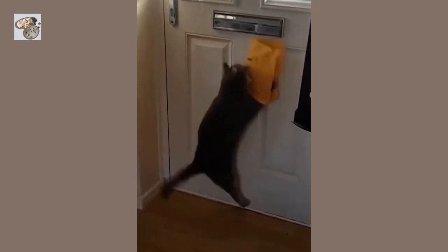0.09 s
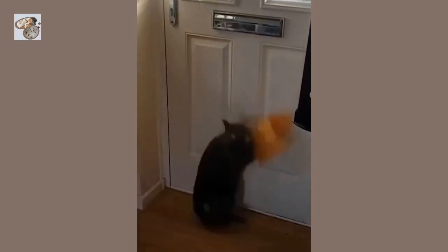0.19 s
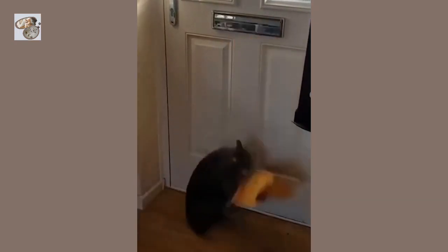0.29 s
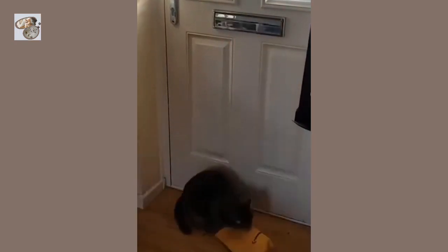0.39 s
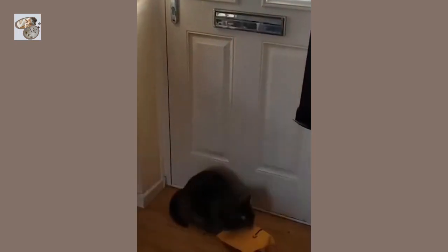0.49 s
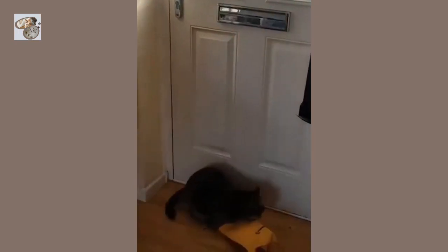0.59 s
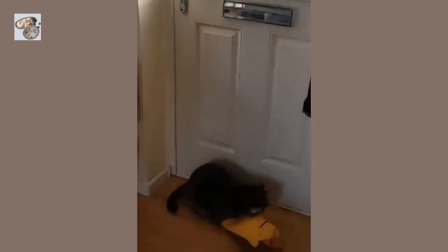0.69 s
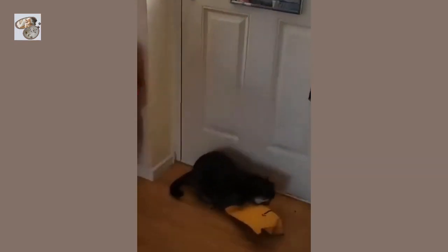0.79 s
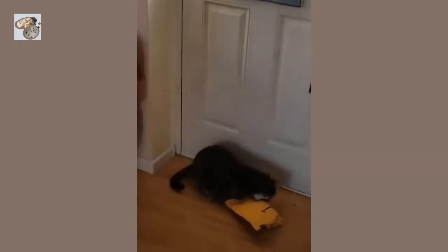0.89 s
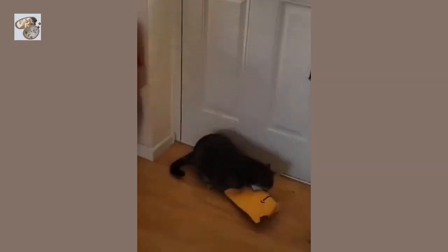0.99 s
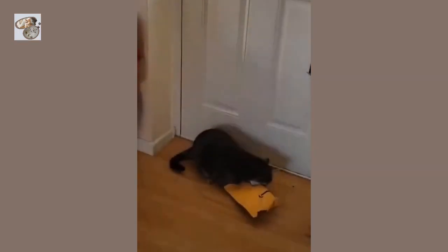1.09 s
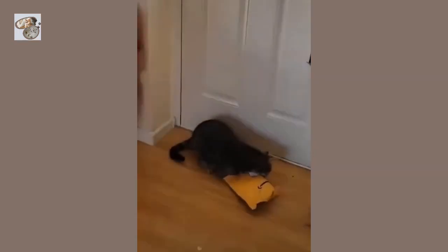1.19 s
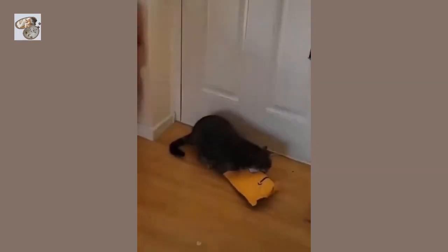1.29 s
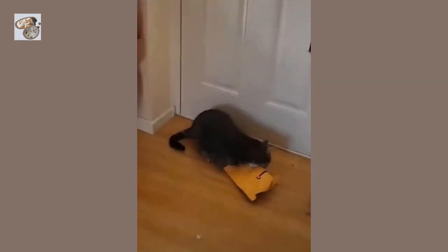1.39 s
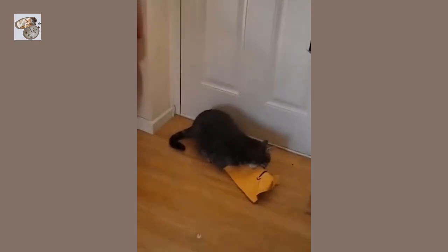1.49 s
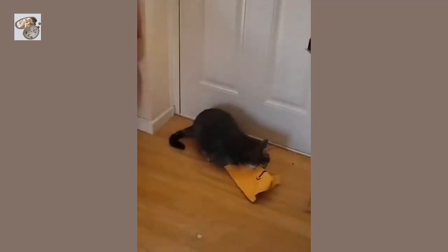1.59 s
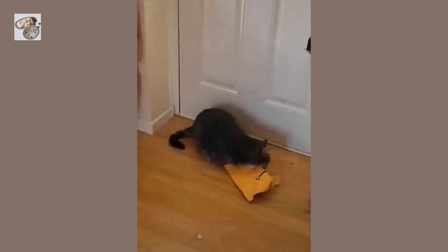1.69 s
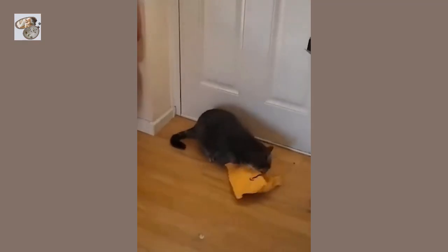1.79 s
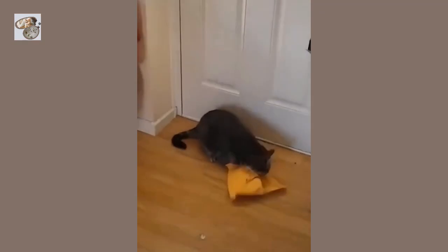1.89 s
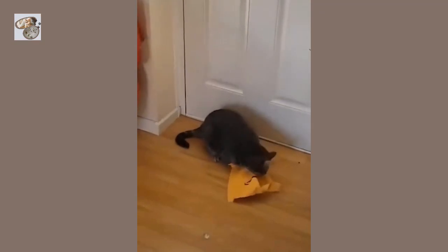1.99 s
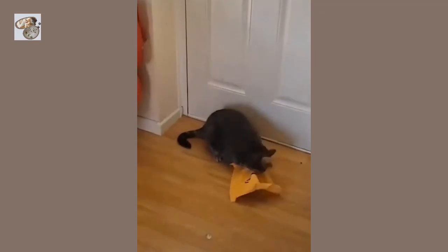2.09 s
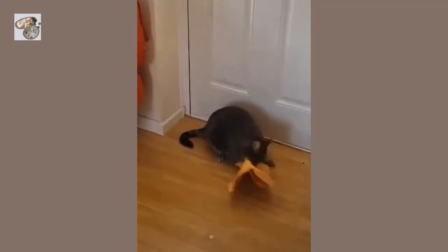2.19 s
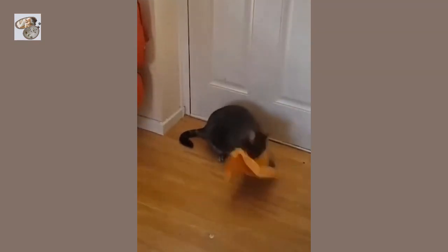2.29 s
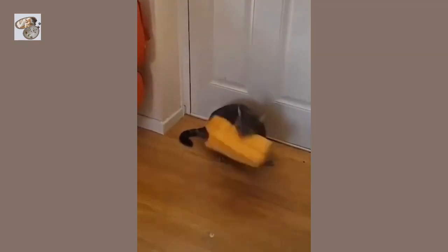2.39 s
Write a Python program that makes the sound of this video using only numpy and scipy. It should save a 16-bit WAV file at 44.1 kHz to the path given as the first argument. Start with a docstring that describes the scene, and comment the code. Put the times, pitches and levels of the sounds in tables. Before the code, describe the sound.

Padded envelope rasps through a letterbox flap, lands with a heavy wooden thud, then rustles quietly.

```python
"""In a small bare hall with a wooden floor, a cat drags a padded envelope out of a metal letterbox.
Paper scrapes and rasps through the flap: noise of tiny slips, shaped by jerks and resonances.
The cat lands on ringing floor modes; the envelope slaps down in filtered bursts and topples flat.
Short bright ticks come from snapping paper, then claws; paws and nose bring rustles, pops and rubs.
In stereo, with reflections after 2 ms over a quiet house, through a microphone with a bass roll-off."""
import sys
import numpy as np
from scipy import signal
from scipy.fft import rfft, irfft
from scipy.io import wavfile
from scipy.ndimage import uniform_filter1d

SR = 44100
rng = np.random.default_rng(int(sys.argv[2]) if len(sys.argv) > 2 else 0)


def wrap_up_sound(samples):
    """Save the sound to the file named by the first command line argument, as 16-bit audio."""
    columns = np.atleast_2d(samples).T
    # keep every value between -1 and 1, then stretch to whole-number steps
    tamed = np.clip(columns, -1, 1)
    steps = np.round(tamed * 32767).astype(np.int16)
    wavfile.write(sys.argv[1], SR, steps)


N = 105840  # 2.4 s

# Spectrum tables set relative balance only, unless noted.
# House background: (frequency [Hz], level [dB])
QUIET_SPECTRUM = [(20, 4), (58, 2.5), (100, -6), (160, -3.5), (310, -23), (1000, -21), (2600, -18.5),
                  (5500, -17), (8000, -33), (12500, -27.5), (14000, -57)]
# Decay of the hall: (frequency [Hz], t60 [s])
HALL_DECAY = [(60, 0.41), (200, 0.49), (500, 0.43), (1200, 0.44), (3000, 0.45), (7000, 0.36), (13000, 0.27)]
# Strength of the reflections, used as it stands: (frequency [Hz], level [dB])
HALL_LEVEL = [(50, -19), (150, -20), (300, -3.5), (600, -2.5), (1200, 1), (5000, 1), (12000, 1.5)]
# Envelope shoved along the floor: (time [s], length [s], level [dB])
SHOVES = [(1.478, 0.29, -57), (1.813, 0.15, -49), (1.972, 0.135, -61.5)]
# Rub on the boards: (frequency [Hz], level [dB])
SHOVE_SPECTRUM = [(80, -16), (150, -5), (210, -2), (310, -6), (450, -24), (1200, -40), (14000, -72)]
# Short bright ticks, paper snapping as the pull begins, then claws: (time [s], level [dB])
TICKS = [(.1605, -46), (.1745, -31), (1.485, -32), (1.505, -39.5), (1.614, -32)]
# Tick: (frequency [Hz], level [dB])
TICK_SPECTRUM = [(200, -26), (1500, -12), (3000, -11), (4500, -3.5), (6500, -5), (8300, -26), (11500, -12),
                 (14000, -19)]
# Paws and body landing: (time [s], level [dB], contact [s])
LANDINGS = [(.305, -12, 0.0075), (0.348, -22, 0.0073), (.392, -19.5, 0.0072), (.434, -11.5, 0.0045),
            (.4512, -7.5, 0.0022), (0.47, -9, 0.0027), (0.506, -26, 0.0016), (0.525, -30, 0.007),
            (2.093, -44.5, 0.0057)]
# Modes of the wooden floor: (frequency [Hz], level [dB], t60 [s])
FLOOR_MODES = [(62.5, -22.5, 0.7), (71, -23, 0.68), (90.8, -13.5, 0.37), (108, -16, 0.29),
               (158.9, -8.5, 0.31), (206.6, 0, 0.16), (331, -8, 0.16), (463, -11, 0.25), (590, -9.5, 0.14),
               (711, -6, 0.17), (860, -11, 0.21)]
# Paper rasping in the slot: (time [s], pitch [Hz], width [Hz], level [dB])
RASP_PATH = [(.18, 880, 110, -52.5), (.248, 850, 150, -30.5), (.275, 910, 249, -45),
             (0.322, 1420, 500, -33.5), (0.355, 2340, 1500, -34), (.368, 2500, 1500, -57)]
# Pull through the flap: (time [s], level [dB])
PULL_LEVEL = [(.168, -54), (.175, -48), (.184, -48), (.19, -38), (.205, -40), (.216, -25), (.25, -29),
              (.28, -28), (.312, -34), (.355, -33), (.366, -51.5), (.43, -33), (.45, -35)]
# Gain on the treble of the scrape: (time [s], gain [dB])
PULL_TREBLE = [(.17, -0.5), (.19, 12.5), (.22, -9), (.24, 8.5), (.27, -28), (.3, -7.5), (.43, -1.5)]
# Paper scrape: (frequency [Hz], level [dB])
SCRAPE_SPECTRUM = [(100, 4.5), (300, -5), (700, 1), (1300, 1.5), (2000, 1.5), (4300, 1.5), (6800, -5),
                   (8200, -18), (10000, -8), (12500, -11), (14000, -32.5)]
# Steady resonances of the scraped paper: (frequency [Hz], level [dB], t60 [s])
PAPER_MODES = [(858, -23.5, 0.056), (1285, -21, 0.075)]
# Flap rattling shut: (time [s], level [dB])
RATTLES = [(.471, -23), (.511, -29.5), (.546, -35)]
# Envelope hitting the floor: (time [s], level [dB], t60 [s], body [dB], fizz [dB])
SLAPS = [(.439, -23.5, 0.13, 13, 19.5), (.453, -25.5, .12, 10, 12.5), (.467, -21.5, 0.088, 14.5, -12),
         (.482, -32, 0.19, 7.5, -7), (0.734, -24, .12, -5, -3), (0.7396, -14.5, 0.029, -0.5, -4),
         (.743, -24.5, .13, 3, -2), (.764, -27, 0.12, 7.5, -17)]
# Slap: (frequency [Hz], level [dB])
SLAP_SPECTRUM = [(60, -35.5), (200, 7), (430, -4), (750, -1), (1050, -7), (2300, -2.5), (4800, -6),
                 (6500, -9), (8200, -20), (9500, -20.5), (12400, -21), (14000, -39)]
# Paper rubbed and creased: (time [s], length [s], level [dB], body [dB], fizz [dB])
STROKES = [(0.513, 0.038, -44.5, 12, 4), (0.643, 0.029, -42, -23, 5), (0.811, 0.047, -44, 3.5, 4),
           (0.962, 0.067, -64, 17.5, -12), (1.041, 0.028, -57, -11, 10), (1.162, 0.024, -47, -28, 10.5),
           (1.221, 0.029, -42.5, -13, 1), (1.284, 0.017, -45, -2.5, 11.5), (1.329, 0.063, -49.5, 3.5, 8),
           (1.476, 0.065, -52.5, -3, 8.5), (1.583, 0.019, -54.5, -2, -5), (1.695, 0.055, -55.5, 14, 2),
           (1.792, 0.069, -49.5, -12, 1), (1.855, 0.058, -46, 2, 1), (2.046, 0.17, -49.5, -27.5, 5),
           (2.204, 0.074, -45, -4.5, 11.5), (2.258, 0.017, -43.5, 8.5, -19),
           (2.292, 0.078, -45.5, -9, 13.5), (2.342, .014, -39, -26, -1)]
# Paper rustle: (frequency [Hz], level [dB])
RUSTLE_SPECTRUM = [(80, -7), (230, -8.5), (450, -2), (800, 0.5), (1400, -2.5), (2500, -1.5), (4000, -3.5),
                   (6300, -10.5), (8200, -29.5), (10000, -25), (12500, -26.5), (14000, -54)]
# Paper creasing with a snap: (time [s], level [dB], body [dB], fizz [dB])
CREASES = [(1.2045, -34.5, -9.5, -14), (1.3604, -33, 5.5, -8), (1.6846, -43, 6, 0), (1.691, -42, 7.5, 4),
           (1.8417, -32.5, 1, -14), (1.889, -35.5, 2, 2.5), (1.897, -37, 1, 1), (2.263, -39, 9, -8)]
# Paper panels popping, taps, and the knock of the envelope toppling at 0.74 s:
# (time [s], level [dB], pitch [Hz], t60 [s])
POPS = [(0.2824, -20.5, 228, 0.098), (0.7051, -23, 285, 0.051), (.7405, -10.5, 480, 0.014),
        (1.168, -39.5, 480, 0.022), (1.1755, -34, 616, 0.022), (1.298, -45, 547, 0.023),
        (1.684, -36, 256, 0.039), (1.685, -32.5, 670, 0.013), (1.891, -26.5, 292, 0.033)]

BODY_HZ, FIZZ_HZ = 890, 7400  # corners of the low and high shelves
SAME_BELOW_HZ, SPREAD = 465, 0.46  # bass shared by both channels; side share of the crackle
QUIET_DB = -58.5  # gain on the background
ECHO_DELAY_S = .002
LEAN_DB = 0.63  # reflections: right channel raised, left lowered by this much
TICK_T60_S, CREASE_T60_S = 0.0066, .045
RATTLE_HZ, RATTLE_T60_S = 1204, 0.069
JERK_DB, JERK_S = 1.5, 0.0056  # deviation and smoothing time of the pull
PATCH_DB, PATCH_HZ, PATCH_S = 2.5, 120, 0.023  # deviation and patch size of the unevenness
SLAP_RISE_SHARE = 0.024  # of the slap's t60
RISE_SHARE, RELEASE_S = 0.19, 0.016  # a longer stroke also swells more slowly
FLUTTER_DB, FLUTTER_T60_S, FLUTTER_OCTAVES = -18, 0.082, .6  # level relative to the pop
LOW_CUT_HZ, EDGE_HZ = 58, 13950


def amp(db):
    """Decibels to gain."""
    return 10 ** (np.asarray(db) / 20)


def read(points, hz):
    """Reads a frequency table on a logarithmic axis."""
    f, value = np.transpose(points)
    return np.interp(np.log(hz + 1), np.log(f + 1), value)


def seconds(length):
    """Time axis of one sound."""
    return np.arange(int(length * SR)) / SR


def add(mix, s, sound):
    """Places a sound in the mix at s seconds."""
    part = mix[:, round(s * SR):][:, :sound.shape[-1]]
    part += sound[..., :part.shape[1]]


def high_pass(hz, order=2):
    """Butterworth sections that remove the range below hz."""
    return signal.butter(order, hz, "high", fs=SR, output="sos")


def colour(x, points, body_db=0, fizz_db=0, size=2048):
    """Causal filter of unit power, with a low and a high shelf on top."""
    hz = abs(np.fft.fftfreq(size, 1 / SR))
    gain = amp(read(points, hz))
    body = body_db / (1 + (hz / BODY_HZ) ** 2)
    fizz = fizz_db * (1 - 1 / (1 + (hz / FIZZ_HZ) ** 6))
    log_gain = np.log(gain * amp(body + fizz) / np.sqrt(np.mean(gain ** 2)))
    # minimum phase from the log gain
    taps = np.fft.ifft(np.exp(np.conj(signal.hilbert(log_gain)))).real
    return signal.fftconvolve(x, taps[None], axes=1)


def ring(modes):
    """Dying modes after one knock."""
    t = seconds(2)
    return sum(amp(db - 60 * t / t60) * np.sin(2 * np.pi * hz * t) for hz, db, t60 in modes)


def crackle(t, rate, spread_db, hiss):
    """Tiny slips of uneven size over smooth friction, partly different in each channel."""
    size = amp(spread_db * np.minimum(rng.exponential(1, len(t)), 3))
    size = size * (rng.random(len(t)) < rate / SR)  # rate: slips per second
    slip_power = size ** 2 / (np.mean(size ** 2) + 1e-9)
    size = np.sqrt((slip_power + hiss ** 2) / (1 + hiss ** 2))
    mid, side = rng.standard_normal((2, len(t))) * size
    side = signal.sosfilt(high_pass(SAME_BELOW_HZ), side)
    return np.array([mid + SPREAD * side, mid - SPREAD * side])


def quiet():
    """Low house rumble, alike in both channels, under a faint hiss."""
    mid, side = colour(rng.standard_normal((2, N + SR)), QUIET_SPECTRUM)
    side = 0.85 * signal.sosfilt(high_pass(SAME_BELOW_HZ), side)
    # the first second lets the filters settle
    return amp(QUIET_DB) * np.array([mid + side, mid - side])[:, SR:SR + N]


def hall(x):
    """Dense reflections, shared by both channels in the bass, each band dying at its own speed."""
    hz, t, z = signal.stft(rng.standard_normal((3, SR)), SR, nperseg=512)
    t60 = read(HALL_DECAY, hz)[:, None]
    same = 1 / (1 + (hz[:, None] / SAME_BELOW_HZ) ** 6)
    z = np.sqrt(same) * z[2] + np.sqrt(1 - same) * z[:2]
    decay = amp(read(HALL_LEVEL, hz)[:, None] - 60 * t / t60)
    z = z * decay * np.sqrt(2 * np.log(1000) / (t60 * SR))  # equal energy for any t60
    reflections = signal.istft(z, SR, nperseg=512)[1]
    out = np.zeros((2, N))
    add(out, ECHO_DELAY_S, signal.fftconvolve(x, reflections, axes=1))
    return out


def nudges():
    """The padded envelope is shoved along the boards with a hollow low rub."""
    out, t = np.zeros((2, N)), seconds(.5)
    for s, length, db in SHOVES:
        shape = np.sin(np.pi * np.minimum(t / length, 1)) ** .5 * amp(db)
        add(out, s, colour(rng.standard_normal((1, len(t))) * shape, SHOVE_SPECTRUM))
    return out


def snaps_and_claws():
    """Paper snaps as the pull begins, then claws tick: short dry bursts of dying noise."""
    out, t = np.zeros((2, N)), seconds(.02)
    for s, db in TICKS:
        tick = rng.standard_normal((1, len(t))) * amp(db - 60 * t / TICK_T60_S)
        add(out, s, colour(tick, TICK_SPECTRUM))
    return out


def landing():
    """Each soft blow pushes the floorboards; a longer contact sounds duller."""
    out, boards, t = np.zeros((2, N)), ring(FLOOR_MODES), seconds(.03)
    for s, db, contact in LANDINGS:
        push = t / contact * np.exp(-4 * t / contact)
        add(out, s, amp(db) * signal.fftconvolve(boards, push / push.sum()))
    return out


def rasp():
    """Slips ring a short stretch of paper whose pitch rises and blurs as it leaves the slot."""
    at, pitch, width, db = np.transpose(RASP_PATH)
    slips = crackle(seconds(.5), rate=4400, spread_db=2, hiss=1)
    hz, t, z = signal.stft(slips, SR, nperseg=1024, noverlap=768)
    offset = hz[:, None] - np.interp(t, at, pitch)
    peak = 1 / (1 + (2 * offset / np.interp(t, at, width)) ** 2)
    level = amp(np.interp(t, at, db, left=-120, right=-120))
    z = z * peak / np.sqrt(np.mean(peak ** 2, axis=0)) * level
    out = np.zeros((2, N))
    add(out, 0, signal.istft(z, SR, nperseg=1024, noverlap=768)[1])
    return out


def uneven(x):
    """Random patches of gain over time and frequency make the noise uneven."""
    hz, t, z = signal.stft(x, SR, nperseg=1024, noverlap=768)
    steps = np.arange(-12, 13)
    time_blur = np.exp(-.5 * (steps * t[1] / PATCH_S) ** 2)
    pitch_blur = np.exp(-.5 * (steps * hz[1] / PATCH_HZ) ** 2)
    blur = np.outer(time_blur, pitch_blur)
    patches = signal.fftconvolve(rng.standard_normal((len(t), len(hz))), blur, "same").T
    gain = amp(PATCH_DB * patches / patches.std())
    z = z * gain / np.sqrt(np.mean(gain ** 2))
    return signal.istft(z, SR, nperseg=1024, noverlap=768)[1][:, :N]


def scrape():
    """Paper slips in quick jerks and rings faintly, then the flap rattles shut."""
    t = seconds(.5)
    jerks = uniform_filter1d(rng.standard_normal(len(t)), max(int(JERK_S * SR), 2))
    level_db = np.interp(t, *np.transpose(PULL_LEVEL), left=-120, right=-120)
    level_db = level_db + JERK_DB * jerks / jerks.std()
    slips = crackle(t, rate=3500, spread_db=1.8, hiss=1.0) * amp(level_db)
    treble = signal.sosfiltfilt(high_pass(FIZZ_HZ), slips)
    slips = slips + treble * (amp(np.interp(t, *np.transpose(PULL_TREBLE))) - 1)
    out = np.zeros((2, N))
    add(out, 0, colour(slips, SCRAPE_SPECTRUM))
    add(out, 0, amp(-10.5) * signal.fftconvolve(slips, ring(PAPER_MODES)[None], axes=1))
    for s, db in RATTLES:
        add(out, s, ring([(RATTLE_HZ, db, RATTLE_T60_S)]))
    return out


def pop(db, hz, t60):
    """One dying tone for the pop or knock, with a noisy flutter of the padding around its pitch."""
    t = seconds(0.36)
    octaves = np.log2((np.fft.rfftfreq(len(t), 1 / SR) + 1) / hz)
    band = np.exp(-.5 * (octaves / FLUTTER_OCTAVES) ** 2)
    flutter = irfft(rfft(rng.standard_normal(len(t))) * band, len(t))
    shudder = flutter / flutter.std() * amp(db + FLUTTER_DB - 60 * t / FLUTTER_T60_S)
    return ring([(hz, db, t60)])[:len(t)] + shudder


def envelope():
    """Slaps on the floor and strokes of uneven paper noise, with creases, pops and knocks."""
    out, t = np.zeros((2, N)), seconds(.5)
    for s, db, t60, body_db, fizz_db in SLAPS:
        shape = np.minimum(t / (SLAP_RISE_SHARE * t60), 1) * amp(db - 60 * t / t60)
        slap = crackle(t, rate=4000, spread_db=3.5, hiss=1.0) * shape
        add(out, s, colour(slap, SLAP_SPECTRUM, body_db, fizz_db))
    for s, length, db, body_db, fizz_db in STROKES:
        swell = np.minimum(t / (RISE_SHARE * length), 1)
        release = np.exp(-np.maximum(t - length, 0) / RELEASE_S)
        stroke = crackle(t, rate=2000, spread_db=3.0, hiss=1.15) * swell * release * amp(db)
        add(out, s, colour(stroke, RUSTLE_SPECTRUM, body_db, fizz_db))
    out = uneven(out)
    for s, db, body_db, fizz_db in CREASES:
        snap = crackle(t, rate=4600, spread_db=3.5, hiss=1.5) * amp(db - 60 * t / CREASE_T60_S)
        add(out, s, colour(snap, RUSTLE_SPECTRUM, body_db, fizz_db))
    for s, db, hz, t60 in POPS:
        add(out, s, pop(db, hz, t60))
    return out


def scene():
    """All sources direct and reflected by the hall, over the quiet house."""
    sources = uneven(scrape()) + rasp() + landing() + envelope() + nudges()
    ticks = snaps_and_claws()
    reflected = hall(sources + amp(-6.5) * ticks)  # the ticks excite the hall less
    lean = amp(LEAN_DB * np.array([[-1], [1]]))
    return sources + ticks + reflected * lean + quiet()


def record(dry):
    """The microphone's bass roll-off and the recorder's band limit."""
    thin = signal.sosfilt(high_pass(LOW_CUT_HZ, order=3), dry)
    band_limit = signal.firwin(255, EDGE_HZ, window=("kaiser", 9), fs=SR)
    return signal.oaconvolve(thin, band_limit[None], "same")


dry = scene()
out = record(dry)
wrap_up_sound(out)
```